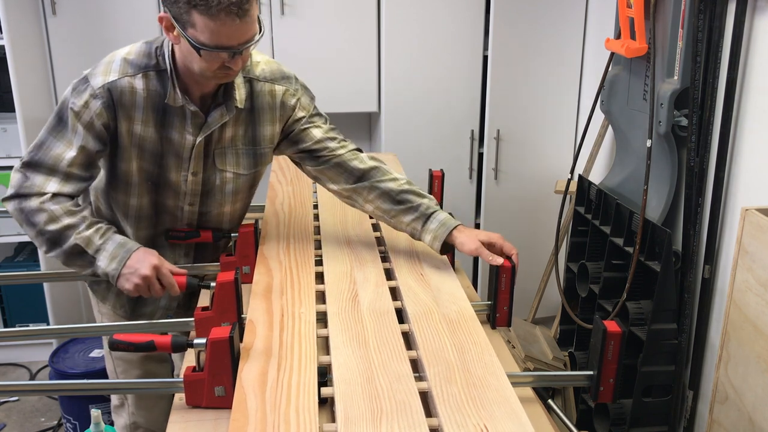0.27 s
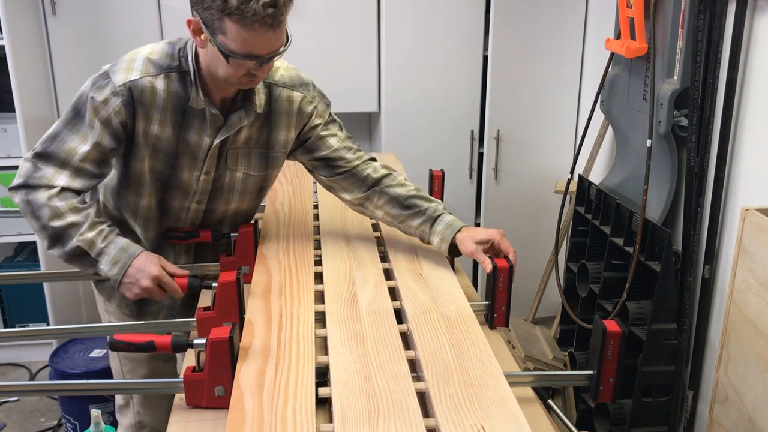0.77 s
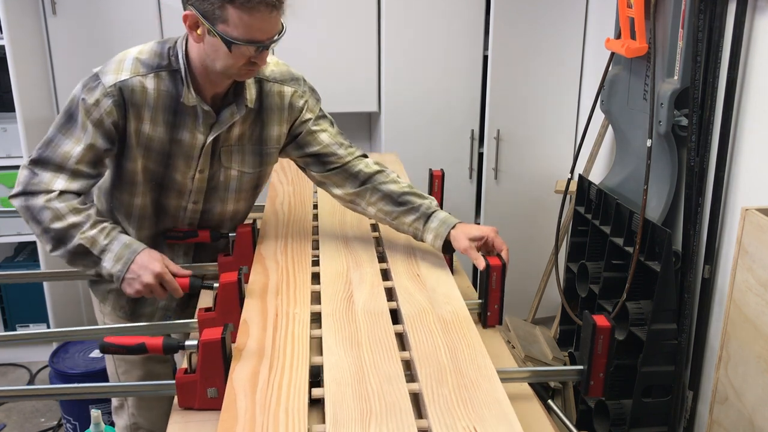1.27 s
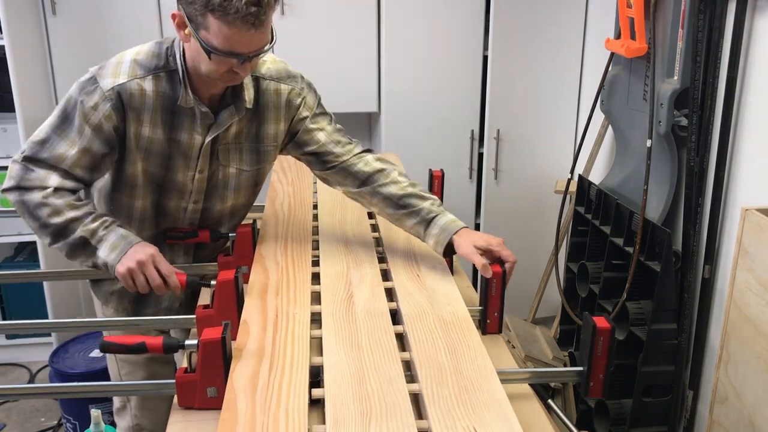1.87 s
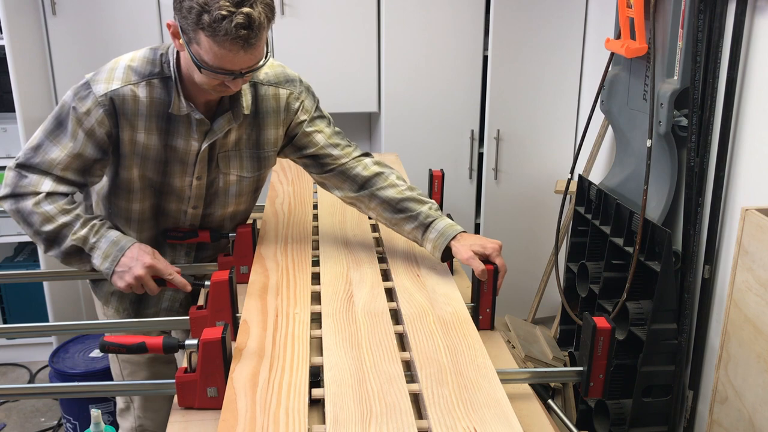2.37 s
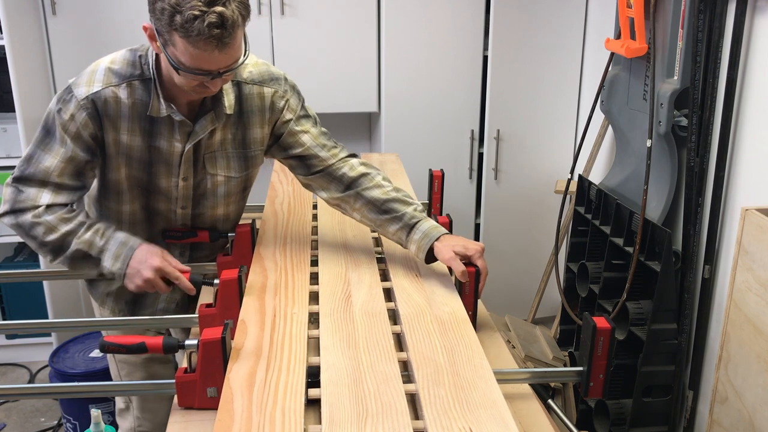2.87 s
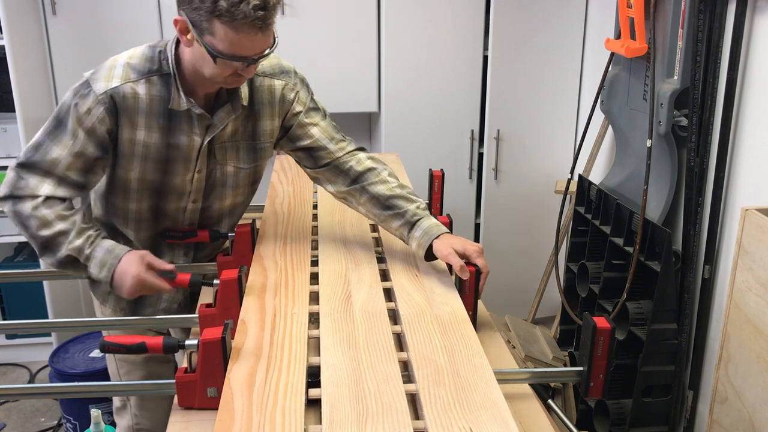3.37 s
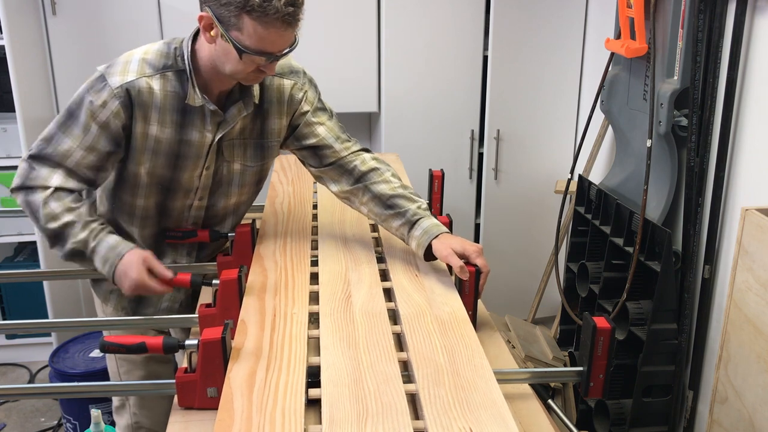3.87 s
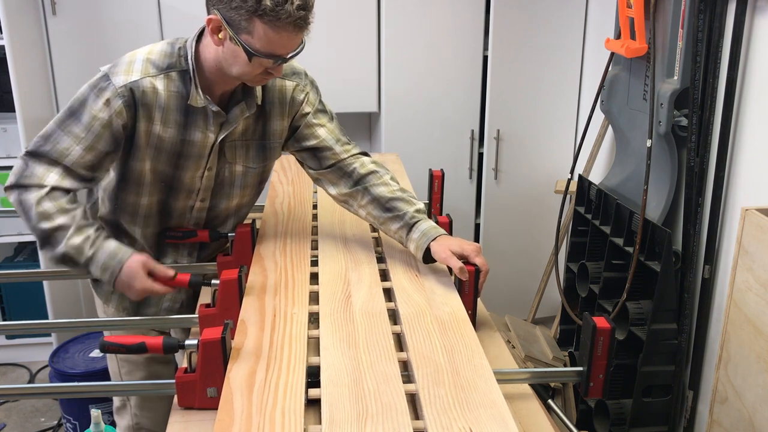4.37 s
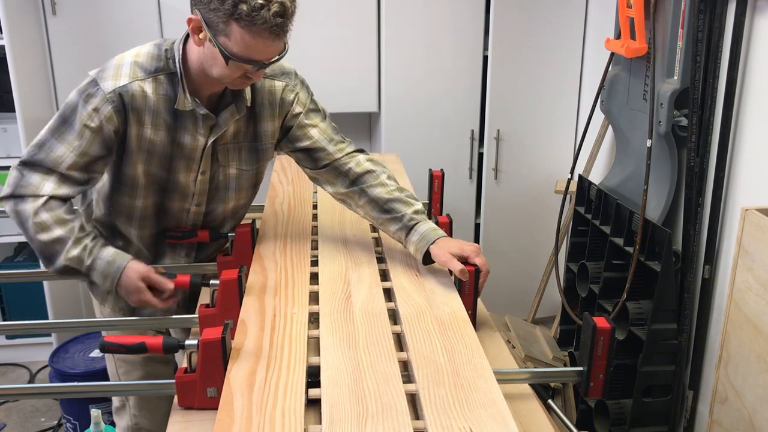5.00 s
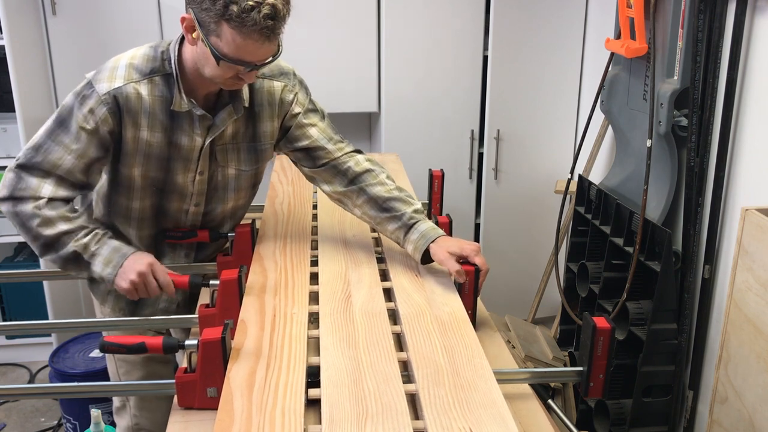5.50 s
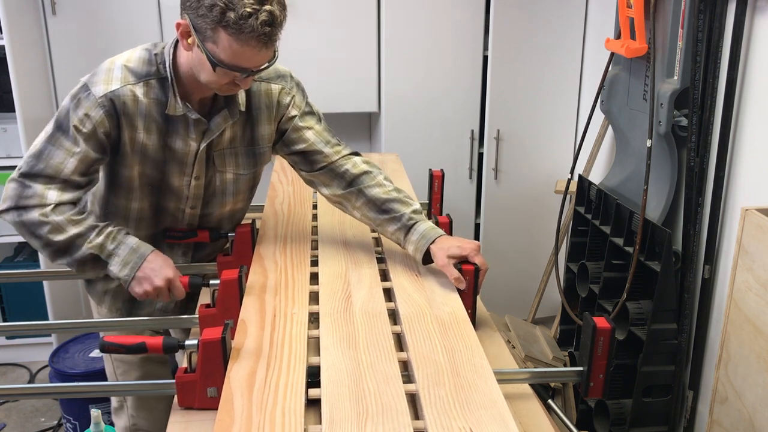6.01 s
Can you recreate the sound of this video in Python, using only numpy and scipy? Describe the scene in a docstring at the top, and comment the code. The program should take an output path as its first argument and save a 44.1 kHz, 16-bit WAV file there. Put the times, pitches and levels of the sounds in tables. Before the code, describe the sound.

Clamp jaws rattle on steel bars and bump pine boards: bright ticks, hollow clacks and dull woody thuds, with brief drags and hand rustle between. Strong knocks come early, a quieter pause follows, then a sharp clattering flurry, then sparse small clicks as the handle turns, and a last firm clack near the end. Heard close in a lively little room with faint background noise.

```python
"""Steel bar clamps are slid and screwed up against pine boards on a bench in a small hard-walled workshop.
Steel clicks as flashes of filtered noise over faint ringing modes, and plastic jaws clack in modes of their own.
Single notes ping from the bar; boards and bench knock as low modes; drags and hands are dense tiny slips.
Every contact chatters briefly, then spreads into a diffuse room tail over a faint hiss."""
import sys
import numpy as np
from scipy import signal
from scipy.fft import rfft, irfft, next_fast_len
from scipy.io import wavfile

SR = 44100
rng = np.random.default_rng(int(sys.argv[2]) if len(sys.argv) > 2 else 0)


def voltage_ratio(decibels):
    """Convert decibels (scalar or array-like) to amplitude ratios, 20 dB per decade."""
    exponent = np.asarray(decibels, float) / 20
    return 10 ** exponent


def wav_record(signal):
    """Record a signal, one row per channel, as 16-bit PCM in the file named by sys.argv[1]."""
    frames = np.transpose(np.atleast_2d(signal))
    bounded = np.clip(frames, -1, 1)
    # unit amplitude maps onto the largest positive 16-bit level
    quanta = np.round(bounded * 32767).astype(np.int16)
    wavfile.write(sys.argv[1], SR, quanta)


N = 275625

# Metal contacts. Each row: start in seconds, nominal crack level in dB, jaw clack in dB relative to it,
# hardness as treble in dB relative to it, favoured jaw ring in Hz.
CLICKS = [(0.0414, -42.5, -29, -12.5, 1010), (0.1088, -58, 17, -3.5, 950), (0.147, -28.5, -5, -10.5, 1010),
          (0.164, -32, 4.5, -28, 961), (0.18, -35, 4.5, -35, 980), (0.2474, -32.5, -1.5, -12.5, 1100),
          (0.3549, -42, -2.5, -18, 890), (0.4178, -45.5, -25, -12.5, 965), (0.4649, -37.5, 6, -10.5, 1160),
          (0.534, -34.5, 1.5, -14.5, 961), (0.563, -41, 7, -4.5, 1000), (0.589, -37.5, 3, -10, 961),
          (0.7644, -41, -2, -11, 770), (0.848, -57, -1, -2, 1010), (0.8631, -35.5, 2, -43, 980),
          (0.8795, -25.5, 6, -31, 950), (0.8905, -22.5, 7, -17.5, 1010), (0.898, -26.5, 4.5, -11, 950),
          (0.9092, -35, 5.5, -18, 845), (0.939, -31.5, 3, -13, 1010), (0.953, -31, 3, -26, 950),
          (1.0812, -35, -2, -13.5, 1060), (1.0957, -36, 3.5, -11, 930), (1.2005, -32.5, 3, -5, 870),
          (1.207, -37, 13, -22, 883), (1.2595, -30.5, 6.5, -27, 670), (1.27, -27, -1, -9.5, 670),
          (1.2905, -38.5, 0.5, -1.5, 720), (1.3259, -26, -13.5, -10, 832), (1.542, -46.5, 2, -24, 710),
          (1.6128, -47, -6, -12, 750), (1.774, -48.5, 8.5, -15, 950), (1.791, -43, -7.5, -11, 1030),
          (1.833, -41, -18, -9.5, 1040), (1.9549, -49, 5.5, -14, 890), (2.052, -45.5, -5, -5, 960),
          (2.07, -40, -9.5, -12, 980), (2.118, -46, 1.5, -6.5, 1010), (2.152, -41.5, -9, -22, 890),
          (2.173, -61, -12, 3.5, 950), (2.2586, -46.5, 16.5, -31, 961), (2.26, -54, 13.5, -27, 834),
          (2.272, -59, 15, -31, 961), (2.4864, -74, 1, -12, 1000), (2.511, -30.5, 2, -11.5, 1010),
          (2.517, -40, 4.5, -21, 1070), (2.534, -50, 1.5, -6, 1060), (2.5652, -27.5, -1.5, -22, 1080),
          (2.5886, -26.5, -4.5, -25, 950), (2.603, -29, -2, -22, 1030), (2.6221, -29, -2.5, -22, 1010),
          (2.626, -27, -5.5, -23, 930), (2.633, -22.5, 3.5, -14.5, 872), (2.644, -20, -1.5, -17, 924),
          (2.657, -30, -1, -22, 834), (2.6792, -41, -6, -14, 680), (2.75, -34, 5, -15, 940),
          (2.7685, -24, -1.5, -9.5, 961), (2.79, -36, 1, -15, 961), (2.8928, -40.5, 8, -35, 1360),
          (2.914, -43.5, 11, -39, 1060), (2.937, -24.5, -3.5, -42, 854), (3.125, -47.5, -13, -15, 900),
          (3.157, -48.5, -9, -11, 834), (3.1889, -56, 10.5, -21, 860), (3.284, -53.5, -1, -14, 955),
          (3.3198, -31.5, -7.5, -7.5, 950), (3.338, -51, 7, -20, 961), (3.385, -61, 8, -30, 900),
          (3.619, -50, -3, -40, 950), (3.666, -49.5, 6, -23, 980), (3.7378, -49.5, -14, -9, 950),
          (3.7594, -39, -14, -5, 834), (3.824, -38, -7.5, -7, 1015), (3.9803, -40, 4.5, -12, 961),
          (4.11, -44, -6.5, -20, 880), (4.278, -28.5, -8.5, -4.5, 900), (4.396, -59, 9.5, -20, 994),
          (4.4984, -51, 8.5, -40.5, 1046), (4.6044, -46.5, -6, -4.5, 960), (4.699, -58.5, 9, -25, 834),
          (4.7065, -50, -7.5, -11, 834), (4.783, -37, -3, -6, 880), (4.8, -63, -12, 3, 950),
          (4.891, -49, 2.5, -34, 746), (4.905, -52, 6.5, -28, 1250), (5.0185, -30.5, 1.5, -25, 1052),
          (5.0396, -44, 2.5, -2.5, 746), (5.1194, -44, -3.5, -3.5, 836), (5.328, -44, -3.5, -3, 980),
          (5.3341, -32, -6, -3, 980), (5.352, -45.5, 9.5, -20, 890), (5.5288, -47, 4, -13, 960),
          (5.6056, -43, 5, -15, 961), (5.6276, -41, -7.5, -5, 877), (5.679, -41, 4, -17, 1010),
          (5.6898, -27, -1, -12.5, 1020), (5.713, -23, -1, -12.5, 1180), (5.8432, -29.5, 1, -15, 1040),
          (5.85, -37, 2, -30, 1045), (5.858, -44, 2.5, -32, 834), (6.0616, -43.5, 8, -34, 1080),
          (6.0747, -36.5, 2, -23.5, 1250), (6.088, -44, 8, -40, 990), (6.0943, -45.5, 6, -28, 694),
          (6.1458, -54, 7.5, -4, 1250)]
# Contacts that leave the free bar ringing on one note. Each row: start in seconds, level in dB, favoured ring in Hz.
PINGS = [(0.045, -66, 2950), (0.4623, -39.5, 2390), (0.88, -26.5, 2390), (0.89, -44, 2536),
         (0.938, -32, 2390), (1.081, -44, 3540), (1.2025, -33, 3180), (1.3227, -46, 3030),
         (1.865, -48, 2620), (2.0687, -39.5, 2470), (2.078, -41, 2770), (2.512, -42, 3470),
         (2.559, -46, 2500), (2.563, -39, 3970), (2.627, -27, 4533), (2.644, -25, 2536),
         (2.6224, -20.5, 3470), (2.938, -55, 2860), (3.1544, -47.5, 2390), (3.318, -48, 2860),
         (3.328, -38, 2470), (3.7616, -36.5, 2390), (4.111, -51, 2390), (4.2795, -32, 2390),
         (4.28, -44, 2645), (4.6032, -45.5, 2390), (4.605, -49, 2870), (4.707, -53, 2870),
         (4.7812, -38, 2870), (4.78, -40, 2536), (4.903, -63, 2390), (5.017, -42.5, 3470),
         (5.0183, -36, 2536), (5.1178, -42.5, 2390), (5.333, -31, 2503), (5.6298, -41, 2330),
         (5.714, -40, 2540), (5.693, -34, 3460), (5.8468, -37, 2175), (5.848, -31, 2270),
         (5.849, -47, 2530), (6.062, -50, 2860), (6.076, -46, 2830)]
# Dull blows on the wood. Each row: start in seconds, nominal board level in dB, bench thud in dB relative to it,
# favoured board ring in Hz, lean of the upper rings in dB.
KNOCKS = [(0.15, -24, -27, 245, -7.5), (0.176, -27, -29, 256, 5), (0.19, -24.5, -20, 240, -0.5),
          (0.222, -31.5, -21, 240, -27), (0.258, -24, -16, 256, -7), (0.29, -30.5, 2, 238, -24),
          (0.462, -29.5, -2, 242, -18), (0.503, -31.5, -14, 256, -7), (0.524, -28.5, -5, 256, -9),
          (0.552, -29, -17, 286, -6), (0.571, -23.5, -18, 235, 3), (0.589, -24.5, -12, 250, 0),
          (0.621, -28.5, -2, 256, -9), (0.765, -33.5, 0, 243, 1.5), (0.893, -19.5, -28, 250, -2.5),
          (0.903, -16.5, -17, 256, -30), (0.934, -18.5, -4.5, 267, -12), (0.971, -28, -2, 238, 0),
          (1.083, -31, -22, 290, -19), (1.093, -25, -20, 290, -12), (1.118, -34.5, -19.5, 277, -8),
          (1.205, -14.5, -8, 317, -16), (1.222, -16, -24, 338, -5), (1.26, -11, -3.5, 340, -15),
          (1.268, -12, -6, 275, -11.5), (1.276, -14, -15, 310, -7), (1.284, -18.5, -22, 280, -12),
          (1.31, -23.5, -16, 252, -6), (1.353, -30, -4, 290, -19), (1.398, -26.5, -7, 343, -23),
          (1.421, -26.5, -15, 290, -15), (1.546, -30.5, 4, 280, -19), (1.567, -29, 1, 278, -10),
          (1.595, -28.5, -11, 250, -4), (1.791, -34, -19, 256, -7), (1.803, -34, -15, 290, -10),
          (1.835, -40.5, -0.5, 270, 6), (1.969, -38, -4, 228, -9), (2.122, -41.5, -22, 235, -17),
          (2.151, -38, -2, 254, -21), (2.173, -30.5, -6, 250, -27), (2.211, -37.5, -17, 263, -8),
          (2.393, -38, -35, 298, -26), (2.413, -41, -28, 290, -24), (2.512, -23, -9, 273, -6.5),
          (2.536, -24, -26, 293, -24), (2.554, -23, -26, 237, -25), (2.597, -17.5, -30, 396, 3),
          (2.633, -22.5, -31, 230, 8), (2.659, -21.5, -19, 229, -17), (2.684, -22, -11, 235, -2),
          (2.748, -30.5, -21, 260, -11), (2.767, -26, -30, 252, -16), (2.791, -24, -36, 235, -10),
          (2.889, -30, -17, 233, -2), (2.947, -24.5, -3, 384, -5.5), (2.988, -36.5, 0, 256, -1),
          (3.166, -39.5, -12, 233, -17), (3.336, -33.5, -21, 228, -10), (3.478, -41, -4, 361, -2),
          (3.714, -41, -29, 285, -3.5), (3.862, -39.5, 1, 270, -15), (3.986, -39, -12, 267, -14),
          (4.014, -45.5, -1, 248, -8), (4.138, -42.5, -25, 353, -5), (4.28, -41, -6, 295, -27),
          (4.375, -42.5, 7, 260, -26), (4.41, -43, 8, 256, -37), (4.636, -38.5, -9, 280, -6),
          (4.791, -40, -2, 323, -9), (4.893, -40, 0, 322, -14), (5.02, -25.5, -25, 371, 2.5),
          (5.353, -34.5, -10, 235, -5), (5.533, -41, -2, 226, -16), (5.609, -34, -22, 229, -26),
          (5.693, -22.5, -17, 264, -9), (5.703, -18, -28, 266, -16), (5.722, -20, -27, 283, -14),
          (5.752, -34, -24, 237, -19), (5.847, -23.5, -14, 367, 2), (6.067, -33.5, -18, 350, 0),
          (6.082, -33.5, -19, 350, -3), (6.166, -32, -18, 228, -12)]
# A jaw or board dragged for a moment. Each row: middle in seconds, length in seconds, board slips in dB,
# clamp slips in dB relative to them.
DRAGS = [(0.008, 0.15, -53, -8), (0.254, 0.46, -40.5, -16.5), (0.57, 0.34, -42.5, -7),
         (0.907, 0.18, -40.5, 3.5), (1.06, 0.82, -41.5, -15.5), (1.274, 0.12, -26.5, -10.5),
         (1.373, 0.56, -40.5, -11.5), (1.596, 0.29, -37, -28), (1.79, 0.21, -55.5, -3.5),
         (2.153, 0.2, -42.5, -18), (2.546, 0.048, -44, 2), (2.569, 0.21, -33.5, -2),
         (2.619, 0.073, -49, 16), (2.767, 0.039, -36.5, 5.5), (2.777, 0.25, -32, -8.5),
         (2.947, 0.43, -48, -6), (3.212, 0.14, -49, -38), (3.393, 0.49, -59.5, 3),
         (4.01, 0.83, -54.5, -5.5), (4.386, 0.13, -51, -9), (4.895, 0.18, -53, -7.5),
         (5.329, 0.038, -46.5, -9.5), (5.44, 0.49, -56.5, -10), (5.73, 0.13, -32, -13),
         (6.091, 0.27, -51.5, -14)]
# The hands on handle and boards throughout. Each row: time in seconds, board slips in dB.
HANDS = [(0, -60.5), (.75, -57), (1.45, -55.5), (1.88, -67), (2.45, -58), (3.1, -65), (3.55, -68.5),
         (3.95, -60), (4.7, -62), (5.15, -57.5), (5.28, -80), (5.55, -60), (5.92, -59.5), (6.25, -59)]

# Resonances of bar and screw. Each row: frequency in Hz, width in Hz, relative level in dB.
STEEL_MODES = [(1810, 80, -1.0), (2175, 49, -27), (2536, 72, -5), (2645, 47, -11), (2390, 73, 0.0),
               (2330, 53, -15.0), (2770, 31, -4), (2870, 61, 10.0), (3180, 110, 3.5), (3470, 45, -15.0),
               (3540, 81, -17.0), (4180, 540, -6.0), (3970, 220, -27), (4600, 48, -13.0), (4533, 140, 11.5),
               (5380, 65, -10.0), (5570, 170, 0.5), (5340, 100, -22.0), (6000, 45, -40.5), (5460, 310, -4),
               (6650, 140, -15.0), (7700, 59, -35.5), (7240, 56, -24.0), (8400, 85, -30), (2270, 14, -19.0),
               (2950, 50, -35.5)]
# Resonances of the plastic jaws; the last two are the dead clack of the pads. Each row: frequency in Hz,
# width in Hz, relative level in dB.
JAW_MODES = [(670, 21.5, -5.5), (746, 15, -6.5), (834, 46, -2.5), (908, 49, -3.5), (890, 31, -7.5),
             (961.6, 25.4, -3), (961, 150, 2), (1010, 35, -3), (1071, 138, 7), (1250, 43, 3),
             (1295, 68, 0.5), (1356, 46, -2.5), (1468, 47, 2), (1510, 52, -9), (950, 88, 6.5),
             (1250, 740, 3)]
# Resonances of the boards; the last two are the short slap of wood on wood. Each row: frequency in Hz,
# width in Hz, relative level in dB.
BOARD_MODES = [(234.6, 12.9, 0), (256, 24, 3), (290, 9.2, -3), (350.9, 17.1, 1), (361, 49, -13.5),
               (425, 140, -2), (493.4, 12.4, -5), (569.3, 6.4, -20), (287.7, 53, 0.5), (490, 120, -3)]
# Resonances of the bench; the last is the dead thud of the top. Each row: frequency in Hz, width in Hz,
# relative level in dB.
BENCH_MODES = [(65.5, 16, -41), (79, 6.8, -5), (100.3, 10.8, -1), (127.7, 4.1, -27.5), (106, 91, 3)]

# Colour of a click's crack. Each row: frequency in Hz, gain in dB.
CRACK_COLOUR = [(1100, -9), (1600, -8.5), (2400, 2), (3000, -5), (3600, -32)]
# Colour of the tick above the crack. Each row: frequency in Hz, gain in dB.
TICK_COLOUR = [(2700, -7), (3200, -1), (4300, -2), (5000, -22.5)]
# Colour of the snap of hard contacts. Each row: frequency in Hz, gain in dB.
SNAP_COLOUR = [(4000, -44), (4600, -5.5), (5900, 0), (7200, -4), (8000, -17)]
# Colour of the fizz of a click. Each row: frequency in Hz, gain in dB.
FIZZ_COLOUR = [(4120, -63), (7000, -14), (7870, 8), (9100, 11), (10200, 6), (11500, -7)]
# Colour of the sheen, the topmost part of a click. Each row: frequency in Hz, gain in dB.
SHEEN_COLOUR = [(9500, -4), (11200, 7.5), (13100, 12), (14600, 3), (16000, -1)]
# How well the boards send sound out; narrow boards give little bass. Each row: frequency in Hz, gain in dB.
BOARD_REACH = [(120, -28), (185, -26), (215, -0.5), (900, 2)]
# How well the bench sends sound out. Each row: frequency in Hz, gain in dB.
BENCH_REACH = [(35, -24), (60, -1), (125, -4.5), (170, -4.5), (300, -18)]
# Decay of the room by band. Each row: band centre in Hz, time to fall by 60 dB in seconds.
ROOM_DECAY = [(100, 0.57), (260, 0.23), (700, 0.29), (1900, 0.33), (5000, 0.29), (12000, 0.12)]
# Spectrum of the steady noise. Each row: frequency in Hz, relative density in dB per Hz.
HISS_COLOUR = [(15, -53), (25, 6.5), (82, 9.5), (170, -7), (263, 2.5), (416, -10), (489, -34), (988, -11),
               (1740, -33), (2410, -18), (4870, -24), (10700, -28), (14800, -21), (16000, -28)]
# Dip of the microphone port. Each row: frequency in Hz, gain in dB.
PORT_DIP = [(9900, -0.5), (10450, -5), (11000, -1)]

BOUNCES = 6  # touches in every contact, the first one included
COPIES, DETUNE = 3, 0.0094  # copies of each set of modes; relative spread of a mode's pitch between them


def steel(slip_db):
    """Bar and screw crack and ring faintly; harder contacts snap and fizz higher up."""
    s, db, _, hardness_db, _ = np.transpose(CLICKS)
    at, size = chatter(s, np.full(len(s), 0.008), fade_db=15.0, scatter_db=6.2, first_db=7.4)
    # the second layer is a rattle: separate small taps among the slips
    slips = grit(slip_db - 1.5, 3400.0, 4.1) + grit(slip_db - 3.5, 210.0, 6)
    upper_db = hardness_db[:, None] * (np.transpose(STEEL_MODES)[0] > 4300)
    rings = body(STEEL_MODES, at, size, db - 15, voltage_ratio(-11) * slips, 4, upper_db)

    crack = burst(at, size, db + 2, 0.0033, CRACK_COLOUR, slips)
    tick = burst(at, size, db + 0.24 * hardness_db + 6.0, 0.0023, TICK_COLOUR, voltage_ratio(4.5) * slips)
    snap = burst(at, size, db + hardness_db + 8.5, 0.0027, SNAP_COLOUR, voltage_ratio(-1) * slips)

    # louder contacts fizz more than in proportion; -58 dB is a faint click, where the extra fizz is zero
    top_db = db + 0.0935 * (db + 58)
    loose = s < 3.05  # the jaw runs loose on the bar, and fizzes more, until the screw bites
    fizz_db = top_db + 1.49 * hardness_db + 5 * loose - 4.0
    fizz_touches = chatter(s, np.full(len(s), 0.022), 26.0, 3.5, 3.7)
    fizz = burst(*fizz_touches, fizz_db, 0.0012, FIZZ_COLOUR, voltage_ratio(-23) * slips)
    sheen_db = top_db + 1.59 * hardness_db + 10.5 * loose - 11.5
    sheen_touches = chatter(s, np.full(len(s), 0.031), 8.8, 3.0, 1.5)
    sheen = burst(*sheen_touches, sheen_db, 0.0014, SHEEN_COLOUR, voltage_ratio(-17.5) * slips)
    return rings + crack + tick + snap + fizz + sheen


def jaws(slip_db):
    """Jaws shaken by the steel follow it and rock a while; jaws hit directly give one short tock."""
    s, db, jaw_db, _, jaw_hz = np.transpose(CLICKS)
    rocking_s = 0.018 * np.clip(0.7 - jaw_db / 18, 0.15, 1.2)
    at, size = chatter(s, rocking_s, fade_db=5.0, scatter_db=1.8, first_db=5.5)
    # a direct hit favours its ring more and dulls the rings above it
    direct_db = np.maximum(jaw_db, 0)[:, None]
    above = np.transpose(JAW_MODES)[0] > 1.19 * jaw_hz[:, None]
    lean_db = lean(JAW_MODES, jaw_hz, 8.5 + 0.5 * direct_db, 0.086) - 0.6 * direct_db * above
    slips = grit(slip_db, 900.0, 4.1)
    return soften(body(JAW_MODES, at, size, db + jaw_db + 5.5, slips, 1.04, lean_db), 0.00008)


def pings():
    """The bar is touched where one mode moves most, so the modes nearest that note lead."""
    s, db, hz = np.transpose(PINGS)
    at, size = chatter(s, np.full(len(s), 0.003), fade_db=4.2, scatter_db=1.5, first_db=8.1)
    return body(STEEL_MODES, at, size, db, 0, 2.0, lean(STEEL_MODES, hz, 31.0, 0.046))


def wood(slip_db):
    """The loose boards settle in several bumps, ring for a moment and pass a thud to the bench."""
    s, db, thud_db, hz, upper_db = np.transpose(KNOCKS)
    # the fainter a knock, the longer the board takes to settle
    settle = np.maximum(1 + 0.08 * (-db - 20), 0.35)
    at, size = chatter(s, 0.01594 * settle, fade_db=6.8, scatter_db=1.82, first_db=2.8)
    slips = grit(slip_db - 1, 330.0, 2.4)
    upper = np.transpose(BOARD_MODES)[0] > 390
    lean_db = lean(BOARD_MODES, hz, 9.8, 0.15) + (upper_db[:, None] + 13.5) * upper
    lean_db[:, -2:] += 0.13 * (db[:, None] + 29.0)  # harder knocks slap more and ring less
    boards = body(BOARD_MODES, at, size, db + 0.5, slips, 1.5, lean_db)

    # the bench shakes to and fro on its legs, so its touches take either sign
    at, size = chatter(s, 0.0281 * np.minimum(settle, 1), fade_db=2.2, scatter_db=2.5, first_db=0.54)
    shakes = size * rng.choice([-1, 1], size.shape)
    bench = body(BENCH_MODES, at, shakes, db + thud_db, slips, 2.2)
    return colour(soften(boards, 0.00025), BOARD_REACH) + colour(bench, BENCH_REACH)


def handling():
    """Slip levels in dB of boards and clamp: the steady hands, and a swell for every drag, added as power."""
    t = np.arange(N) / SR
    coarse_t = t[::64]
    s, length, db, clamp_db = np.transpose(DRAGS)
    from_middle = np.abs(2 * (coarse_t - s[:, None]) / length[:, None])
    swell_db = db[:, None] - 32.5 * from_middle  # dB fall from the middle of a drag to its ends
    hands_db = np.interp(coarse_t, *np.transpose(HANDS))

    def total(drags, hands):
        """Power sum of all drags and the hands, as a smooth level."""
        power = np.sum(voltage_ratio(2 * drags), axis=0) + voltage_ratio(2 * hands)
        return np.interp(t, coarse_t, 10 * np.log10(power))

    return total(swell_db, hands_db), total(swell_db + clamp_db[:, None], hands_db - 13)


def chatter(s, length, fade_db, scatter_db, first_db):
    """A first touch and a few uneven, fading rebounds share a contact's energy: positions and sizes."""
    rebound = np.arange(BOUNCES) > 0
    late = rng.random((len(s), BOUNCES)) * rebound
    rebound_db = scatter_db * rng.standard_normal(late.shape) - fade_db * late
    size = voltage_ratio(np.where(rebound, rebound_db, first_db))
    size /= np.sqrt(np.sum(size ** 2, axis=1, keepdims=True))
    touch_s = s[:, None] + np.abs(length)[:, None] * late
    return np.minimum(touch_s * SR, N - 1).astype(int), size


def grit(db, rate, spread_db):
    """Dense tiny slips of uneven size, about rate per second, evened to unit rms and then set to level db."""
    hit = rng.random(N) < rate / SR
    x = rng.standard_normal(N) * hit * voltage_ratio(spread_db * rng.standard_normal(N))
    return x / np.sqrt(np.mean(x ** 2)) * voltage_ratio(db)


def body(modes, at, size, db, slips, scatter_db, lean_db=0):
    """Blows and slips ring the modes; each blow weighs them its own way.
    A few slightly detuned copies of the modes, taken in turn, keep rings from all sharing exact pitches."""
    hz, width, mode_db = np.transpose(modes)
    scatter = scatter_db * rng.standard_normal((len(at), len(hz)))
    weight = voltage_ratio(mode_db + lean_db + scatter)
    # rebounds add to or cancel a ring; most of that is evened out so that a blow keeps near its strength
    phase = np.exp(2j * np.pi * hz[:, None] * at[:, None] / SR)
    summed = np.abs(np.sum(size[:, None] * phase, axis=2)) ** 2
    strength = np.sqrt(np.sum(weight ** 2 * (1 + 3 * summed) / 4, axis=1))
    weight *= rng.choice([-1, 1], weight.shape) * (voltage_ratio(db) / strength)[:, None]
    # slips drive each mode so that its level does not hang on its width
    steady = voltage_ratio(mode_db) * np.sqrt(4 * np.pi * np.abs(width) / SR) / np.sqrt(np.sum(voltage_ratio(mode_db) ** 2))
    detuned = (np.arange(COPIES) > 0)[:, None]  # the first copy has the table's pitches
    shift = 1 + DETUNE * rng.standard_normal((COPIES, len(hz))) * detuned
    out = np.zeros(N)
    for c in range(COPIES):  # the blows take the copies in turn; slips ring the first
        for k in range(len(hz)):
            push = (size * weight[:, k, None])[c::COPIES]
            blows = np.bincount(at[c::COPIES].ravel(), push.ravel(), N)
            out += ring(blows + (c == 0) * steady[k] * slips, hz[k] * shift[c, k], width[k])
    return out


def ring(x, hz, width):
    """One mode: an impulse of 1 starts a fading wave of height 1, with no steady push left over."""
    r, w = np.exp(-np.pi * abs(width) / SR), 2 * np.pi * hz / SR
    return signal.lfilter([.5, 0, -.5], [1, -2 * r * np.cos(w), r * r], x)


def lean(modes, hz, db, octaves):
    """Extra level for the modes nearest the ring that a blow favours."""
    distance = np.log2(np.transpose(modes)[0] / hz[:, None])
    return db * np.exp(-(distance / octaves) ** 2)


def burst(at, size, db, fade_s, points, slips):
    """Modes too many and too short to tell apart: a flash of noise at each touch."""
    touches = np.bincount(at.ravel(), (size * voltage_ratio(db)[:, None]).ravel(), N)
    fade = np.exp(-np.arange(SR // 40) / SR / fade_s)
    flash = signal.oaconvolve(touches, fade)[:N]
    return colour(flash * rng.standard_normal(N) + slips, points)


def soften(x, push_s):
    """A soft contact pushes for a while, which dulls its edge."""
    t = np.arange(SR // 20) / SR / push_s
    push = t * np.exp(-t)
    return signal.oaconvolve(x, push / np.sum(push))[:N]


def colour(x, points):
    """Filters x with a gain drawn through (Hz, dB) points over log frequency."""
    hz, db = np.transpose(points)
    size = next_fast_len(len(x))
    f = np.fft.rfftfreq(size, 1 / SR) + 1
    gain = voltage_ratio(np.interp(np.log(f), np.log(hz), db))
    return irfft(rfft(x, size) * gain, size)[:len(x)]


def room(near, clack, heavy, thin):
    """Direct sound, then a dense tail that builds up in a few ms and dies band by band.
    The tail blends a few random echo shapes whose shares wander, so it stays diffuse with no steady tones."""
    shapes, step_s, gap_s = 4, 0.025, 0.0016  # echo shapes, seconds per step of the shares, build-up in seconds
    t = np.arange(SR * 3 // 5) / SR
    # knocks and pings are sent more weakly to the tail, so they sound drier
    sent = voltage_ratio(2) * near + voltage_ratio(0.5) * clack + voltage_ratio(-6) * heavy + voltage_ratio(-4) * thin
    out = near + clack + heavy + thin
    steps = np.arange(int(N / SR / step_s) + 2)
    now = np.arange(N) / SR / step_s
    share = np.array([np.interp(now, steps, row) for row in rng.standard_normal((shapes, len(steps)))])
    for part in share / np.sqrt(np.sum(share ** 2, axis=0)):
        tail = 0
        for hz, t60 in ROOM_DECAY:
            band_shape = [(hz / 1.62, -14), (hz / 1.16, 0), (hz * 1.67, 0), (hz * 3.8, -14)]
            band = colour(rng.standard_normal(len(t)), band_shape)
            tail = tail + band * voltage_ratio(-60 * t / t60) / np.sqrt(t60)
        tail *= 1 - np.exp(-(t / gap_s) ** 2)
        tail /= np.sqrt(np.sum(tail ** 2))
        out = out + part * signal.fftconvolve(sent, tail)[:N]
    return out


def hiss():
    """The steady faint noise of room and microphone: coloured noise at a set rms."""
    x = colour(rng.standard_normal(N), HISS_COLOUR)
    return x / np.sqrt(np.mean(x ** 2)) * voltage_ratio(-62)


def scene():
    """Clamps and wood in the workshop."""
    boards_db, clamp_db = handling()
    steel_slip_db = clamp_db - 9  # steel slips lie under those of the jaws
    sound = room(steel(steel_slip_db), jaws(clamp_db), wood(boards_db), pings())
    return (sound + hiss())[None]


def band_limit(x):
    """A steep low-pass at the top of the band."""
    return signal.sosfilt(signal.butter(12, 16430, fs=SR, output="sos"), x)


def record(dry):
    """A phone microphone with a port dip, which drops the deepest bass and the very top."""
    low_cut = signal.butter(2, 46.0, "high", fs=SR, output="sos")
    top_cut = signal.ellip(10, .5, 60, 15950, fs=SR, output="sos")
    mix = signal.sosfilt(low_cut, colour(dry[0], PORT_DIP)[None])
    mix = signal.sosfilt(top_cut, mix)
    return band_limit(mix)


dry = scene()
out = record(dry)
wav_record(out)
```